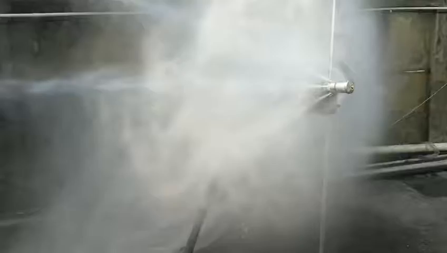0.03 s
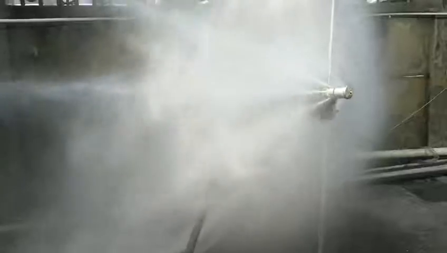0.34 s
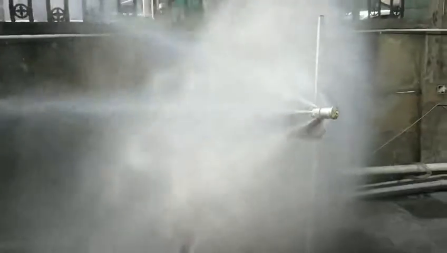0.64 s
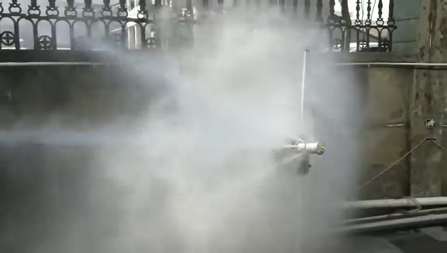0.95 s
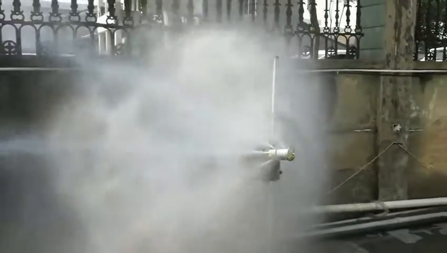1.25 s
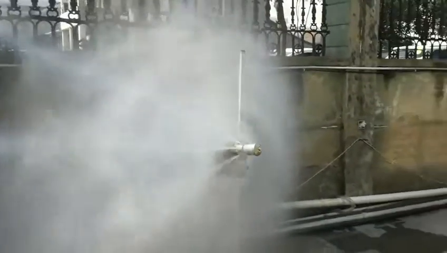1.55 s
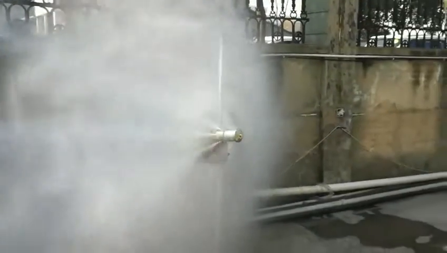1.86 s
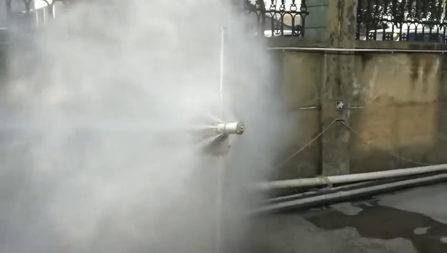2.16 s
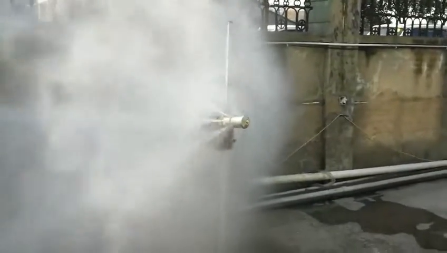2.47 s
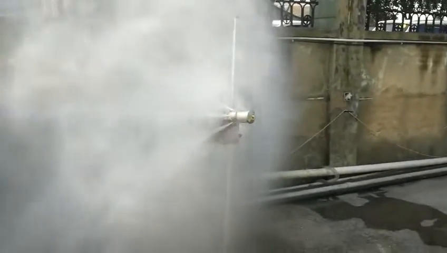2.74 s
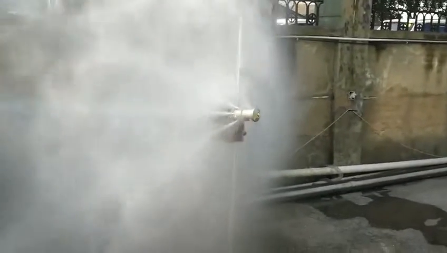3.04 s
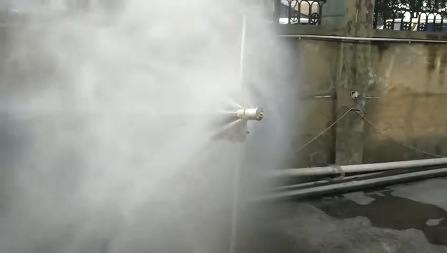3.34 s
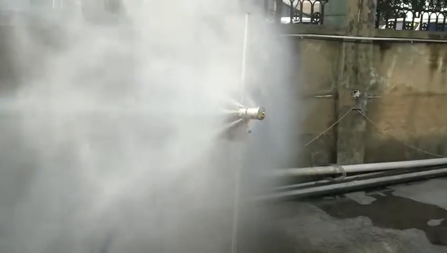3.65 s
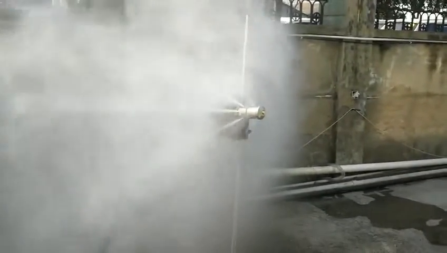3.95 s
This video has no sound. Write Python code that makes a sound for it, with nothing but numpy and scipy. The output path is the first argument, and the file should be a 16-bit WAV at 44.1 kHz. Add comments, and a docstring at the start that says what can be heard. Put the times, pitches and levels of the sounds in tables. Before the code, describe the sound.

A loud, steady hiss of water blasting from a nozzle, an engine humming underneath.

```python
"""A wide, fluttering hiss cuts in abruptly: a high-pressure nozzle blasts water across a walled yard.
Turbulence tears the jets into mist and radiates broadband noise; drop impacts add a fine spatter.
Beneath them an engine and its pump drone, each in harmonics of its own repetition rate.
Bands of the hiss swell and sink, and reflections interfere, as the hand-held microphone shifts."""
import sys
import numpy as np
from scipy import signal
from scipy.fft import rfft, irfft
from scipy.io import wavfile
from scipy.ndimage import uniform_filter1d

SR = 44100
rng = np.random.default_rng(int(sys.argv[2]) if len(sys.argv) > 2 else 0)


def put_to_file(sound):
    """Save the sound as 16-bit audio at rate SR, in the file named by the first command-line argument."""
    columns = np.atleast_2d(sound).T  # one column per channel
    safe = np.clip(columns, -1, 1)
    whole_steps = np.round(safe * 32767)
    wavfile.write(sys.argv[1], SR, whole_steps.astype(np.int16))


N = 176400
START_S = .2875
FRAME, HOP = 512, 128  # samples
TREBLE_FROM_HZ = 1170


def amp(db):
    """Amplitude ratio of a level in decibels."""
    return 10 ** (np.asarray(db) / 20)


def unit(x):
    """Normalisation to an rms of one."""
    return x / np.sqrt(np.mean(abs(x) ** 2) + 1e-20)


def bell(hz, centre, width):
    """Gaussian band, falling to 1/e at one width from its centre."""
    return np.exp(-((hz - centre) / width) ** 2)


def over_hz(points, hz, column=1):
    """Interpolation on a logarithmic frequency axis."""
    table = np.array(points, float)
    return np.interp(np.log(hz + 1), np.log(table[:, 0] + 1), table[:, column])


def over_time(points, t):
    """Linear interpolation in time."""
    return np.interp(t, *np.transpose(points))


def wander(t, low_hz, high_hz):
    """Superposition of slow sines in random phase: a fluctuation of unit rms."""
    rates = np.geomspace(low_hz, high_hz, num=30)
    return unit(sum(np.sin(2 * np.pi * (f * t + rng.random())) / np.sqrt(f) for f in rates))


def drone(t, hz, orders, pitch_waver=.0042, waver_db=1.8):
    """Periodic motion radiates a harmonic series, here wavering in frequency and amplitude."""
    slow = t[::HOP]
    drift = np.interp(t, slow, wander(slow, 0.693, 8))
    turns = np.cumsum(hz * (1 + pitch_waver * drift)) / SR
    sound = 0
    for order, db in orders:
        level_db = db + waver_db * np.interp(t, slow, wander(slow, 1, 12))
        sound += amp(level_db) * np.sin(2 * np.pi * (order * turns + rng.random()))
    return np.sqrt(2) * sound


# Engine firing rate (time [s], frequency [Hz])
FIRING_RATE = [(.3, 107), (1.5, 106.9), (2.7, 106.3), (4, 106.5)]
# Engine harmonics (order [multiple of firing rate], level [dB])
ENGINE_ORDERS = [(1, -45), (3, -58), (4, -41.5), (6, -45.5), (8, -49.5)]
# The engine's loud second harmonic (time [s], level [dB])
ENGINE_HUM = [(.3, -37), (1.3, -33), (2.2, -35.5), (2.8, -39), (3.5, -37), (4, -38)]


def engine(t):
    """Periodic firing sounds at whole multiples of the firing rate."""
    return drone(t, over_time(FIRING_RATE, t), ENGINE_ORDERS + [(2, over_time(ENGINE_HUM, t))])


# Pump harmonics (order [multiple of shaft rate], level [dB])
PUMP_ORDERS = [(3, -44), (4, -51.5), (5, -51), (6, -42), (7, -54.5), (12, -42.5), (14, -44.5), (15, -58.5)]
# The pump's deep second harmonic (time [s], level [dB])
PUMP_THROB = [(.3, -56), (2.2, -49), (3, -44), (4, -47)]


def pump(t, shaft_hz=24.96):
    """Rotation sounds at whole multiples of the shaft rate."""
    return drone(t, shaft_hz, PUMP_ORDERS + [(2, over_time(PUMP_THROB, t))])


# Strength of the jets (time [s], relative level [dB])
JET_FORCE = [(.29, -18), (.33, -19.5), (.45, -18.5), (.75, -17.5), (.93, -18.5), (1.05, -17), (1.18, -17.5),
             (1.35, -16.5), (1.6, -17), (1.71, -18), (1.82, -17.5), (2.12, -17), (2.42, -17.5), (2.6, -17),
             (2.85, -17.5), (3.1, -16.5), (3.85, -17), (3.98, -17.5)]


def force_db(t):
    """Common modulation: spatter and hiss follow the level of the jets about its mean."""
    return over_time(JET_FORCE, t) - np.mean(over_time(JET_FORCE, np.linspace(START_S, N / SR)))


# Spectrum of the drop impacts (frequency [Hz], relative density [dB])
SPATTER_SPECTRUM = [(200, -11), (1000, -11.5), (3000, 1.5), (9000, -1.5), (16000, -5)]


def spatter(t, drops_per_s=2600, spread_db=3.6, largest_db=11, level_db=-24.5):
    """Shot noise: drops strike wall and ground at random as tiny impulses, a few of them larger."""
    size_db = np.minimum(spread_db * rng.exponential(1, (2, N)), largest_db)
    polarity = rng.choice([-1, 1], (2, N))
    strikes = rng.random((2, N)) < drops_per_s / SR
    ticks = amp(size_db + force_db(t)) * polarity * strikes
    colour = amp(over_hz(SPATTER_SPECTRUM, np.fft.rfftfreq(N, 1 / SR)))
    return amp(level_db) * unit(irfft(rfft(ticks) * colour, N))


# Likeness of the two sides in the low roar (frequency [Hz], coherence [0-1])
ROAR_COHERENCE = [(60, .99), (240, 0.89), (480, 0.75), (800, 0.79), (1200, 0.34), (1700, 0.4), (2600, 0)]
# Short paths to the right side (delay [s], signed share [ratio], centre [Hz], half width [Hz])
GLANCING_PATHS = [(0.0013787, -0.61, 9000, 1900), (0.001096, -0.23, 10400, 6000),
                  (0.00062, 0.38, 14300, 1700), (0.00149, -0.46, 5700, 1500),
                  (0.000033, -0.27, 14000, 5000), (0.00014, -0.12, 6000, 7500),
                  (0.000605, -0.12, 4400, 7600), (0.0025, 0.19, 13000, 1800)]
# Lead of the left side as the microphone turns (time [s], lead [s])
LEFT_LEAD = [(.35, -.00001), (1.0, .00006), (1.55, .000135), (2.1, .000135), (2.35, .000117), (4, .000113)]


def stereo_noise(hz, t, roar_lag_s=.00008):
    """Partial coherence: the right spectrum is the left, delayed along several paths, plus diffuse noise."""
    a, b, c, d = rng.standard_normal((4, len(t), len(hz)))
    left, diffuse = a + 1j * b, c + 1j * d
    treble = np.minimum(hz / TREBLE_FROM_HZ, 1)
    shared = over_hz(ROAR_COHERENCE, hz) * np.exp(-2j * np.pi * hz * roar_lag_s)
    for delay, share, centre, width in GLANCING_PATHS:
        shared += share * bell(hz, centre, width) * treble * np.exp(-2j * np.pi * hz * delay)
    shared /= np.maximum(abs(shared), 1)  # coherence cannot exceed one
    shared = shared * np.exp(-2j * np.pi * np.outer(over_time(LEFT_LEAD, t), hz))
    right = shared * left + np.sqrt(np.clip(1 - abs(shared) ** 2, 0, 1)) * diffuse
    return np.array([left, right])


# A close reflection as the microphone moves (time [s], delay [s], peak ripple [dB])
REFLECTION = [(.45, .001035, 1.7), (.85, .001125, 1.5), (1.15, .001175, .9), (1.7, .00119, .4),
              (2.4, .00116, .3)]


def comb_db(hz, t):
    """Interference with a reflection combs the treble; the notches fall as its path lengthens."""
    times, delay, depth = np.transpose(REFLECTION)
    ripple = np.cos(2 * np.pi * np.outer(np.interp(t, times, delay), hz))
    return np.interp(t, times, depth)[:, None] * ripple * bell(hz, centre=8300, width=4000)


# Passing bands of the hiss (start [s], end [s], centre [Hz], half width [Hz], left [dB], right [dB])
SHIFTING_BANDS = [(.1, 0.92, 7900, 380, 7.5, 4.5), (.1, 1.35, 6100, 750, -2, -3),
                  (.1, 0.93, 14600, 1200, 0, -7), (.1, 1.22, 2100, 170, 3.5, 3.5),
                  (.1, 0.87, 3620, 500, 4.5, 1.5), (.55, 1, 12500, 289, 4, 4),
                  (.65, 1.1, 9000, 400, 2.5, 4.5), (1.25, 2.2, 7250, 300, 5, 6.5),
                  (1.35, 2.25, 11800, 260, 4, 6), (1.3, 2.6, 14750, 480, -1, 3),
                  (1.45, 2.07, 10300, 1000, -0.8, -3.5)]


def bands_db(hz, t, fade_s=0.29):
    """The spectrum depends on position: bands swell or sink as the microphone shifts."""
    db = 0
    for begin, end, centre, width, left_db, right_db in SHIFTING_BANDS:
        held = np.clip(np.minimum(t - begin, end - t) / fade_s + .5, 0, 1)
        db += np.multiply.outer([left_db, right_db], np.outer(held, bell(hz, centre, width)))
    return db


def patches(hz, t, span_s=.06, span_hz=350):
    """Smoothing correlates noise in time and frequency: random patches of unit rms."""
    field = rng.standard_normal((len(t), len(hz)))
    field = uniform_filter1d(field, round(span_s / t[1]), axis=0)
    return unit(uniform_filter1d(field, round(span_hz / hz[1]), axis=1))


# Relative spectral density of the jets (frequency [Hz], left [dB], right [dB])
JET_SPECTRUM = [(20, -24.2, -24.5), (35, -13.1, -13.8), (60, -12, -10.5), (129, -5, -10), (260, -2.5, -1.5),
                (440, -3.5, -5), (580, -5.5, -9), (717, -0.5, -3), (1110, -2.5, -4), (1790, -3, -4),
                (2190, -2.5, 0.8), (2680, -7, -1), (3780, -6, -3.5), (4700, 1.5, -3.5), (5560, -1.5, -4.5),
                (6760, -0.6, -2.5), (7500, -6, -2.5), (8200, -2.5, -2.4), (8820, 0.6, -1.5), (9400, 0, 0.5),
                (10100, -0.5, 0), (12000, -5, -7.5), (13100, -1.5, -2.5), (14830, 0, -2),
                (15900, -5, -10.5)]
# Rumble under the hiss (time [s], gain [dB])
JET_RUMBLE = [(.3, 3), (1.4, -1.5), (2.2, -3), (3, 2), (4, 0)]
# Hollow resonances in the hiss (centre [Hz], half width [Hz], gain [dB])
RESONANCES = [(2180, 180, 0.65), (4650, 85, 1.5)]


def jets(level_db=-15, flutter_db=0.62, swell_db=0.54, patch_db=0.78, bass_follows=0.16):
    """Turbulent mixing radiates broadband noise that flutters as the jets break up."""
    hz = np.fft.rfftfreq(FRAME, 1 / SR)
    t = np.arange(0, N + FRAME, HOP) / SR
    spectrum_db = np.array([over_hz(JET_SPECTRUM, hz, column) for column in (1, 2)])
    db = spectrum_db[:, None] + patch_db * patches(hz, t)  # side, time, frequency
    motion_db = force_db(t) + flutter_db * rng.standard_normal(len(t)) + swell_db * wander(t, 6, 40)
    follows = bass_follows + (1 - bass_follows) * np.minimum(hz / TREBLE_FROM_HZ, 1)
    db += np.outer(motion_db, follows)  # the low roar follows only partly
    db += np.outer(over_time(JET_RUMBLE, t), bell(hz, centre=0, width=150))
    db += bands_db(hz, t) + comb_db(hz, t)
    db += sum(gain_db * bell(hz, centre, width) for centre, width, gain_db in RESONANCES)
    spectra = stereo_noise(hz, t) * amp(db)
    _, hiss = signal.istft(spectra, nperseg=FRAME, noverlap=FRAME - HOP, time_axis=1, freq_axis=2)
    return amp(level_db) * unit(hiss[:, :N])


def scene():
    """Superposition of the sources; engine and pump are alike on both sides."""
    t = np.arange(N) / SR
    return jets() + spatter(t) + engine(t) + pump(t)


def record(dry, low_cut_hz=33, high_cut_hz=15800, knee=.62, ceiling=.86, attack_s=0.0017):
    """Band limiting trims rumble and top treble; the sharpest peaks are rounded; the sound cuts in."""
    thinned = signal.sosfilt(signal.butter(4, low_cut_hz, "high", fs=SR, output="sos"), dry)
    excess = np.maximum(abs(thinned) - knee, 0)
    headroom = ceiling - knee
    rounded = thinned - np.sign(thinned) * (excess - headroom * np.tanh(excess / headroom))
    onset = np.clip((np.arange(N) / SR - START_S) / attack_s, 0, 1)
    lowpass = signal.firwin(801, high_cut_hz, window=("kaiser", 8), fs=SR)
    return signal.oaconvolve(rounded * onset, lowpass[None], "same")


dry = scene()
out = record(dry)
put_to_file(out)
```